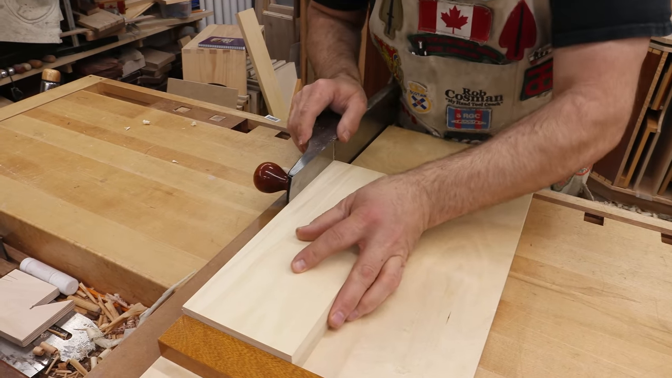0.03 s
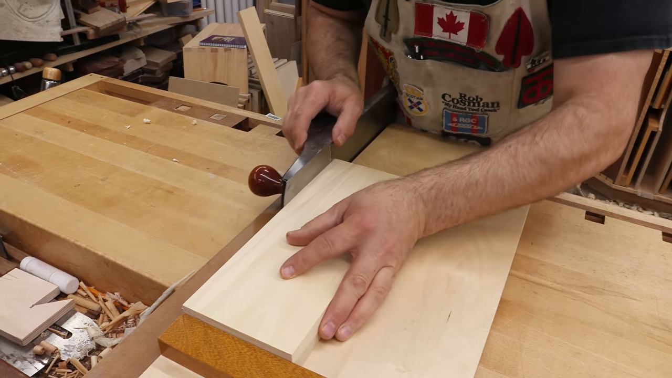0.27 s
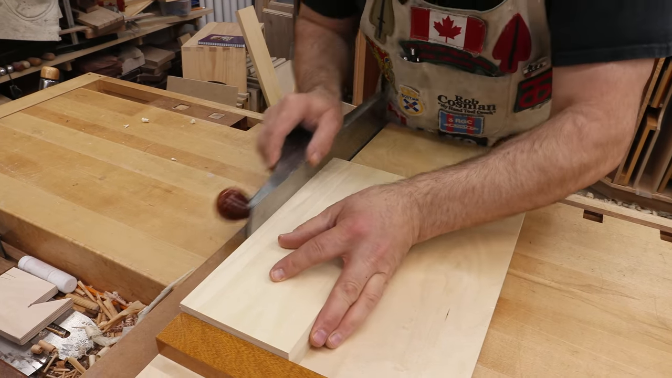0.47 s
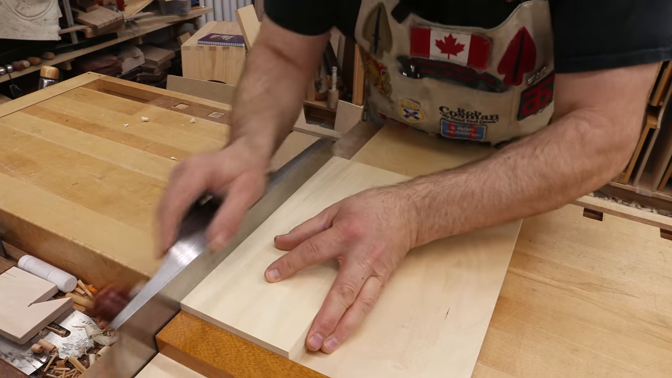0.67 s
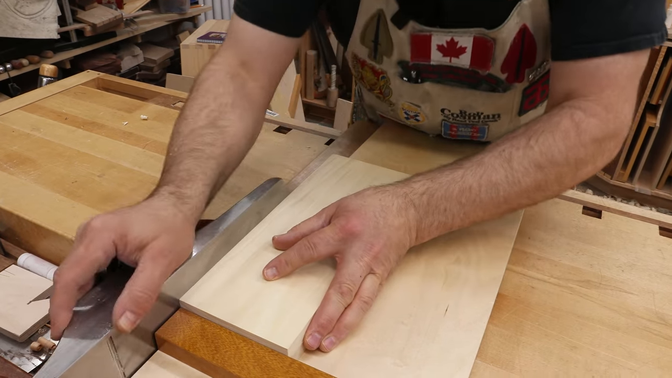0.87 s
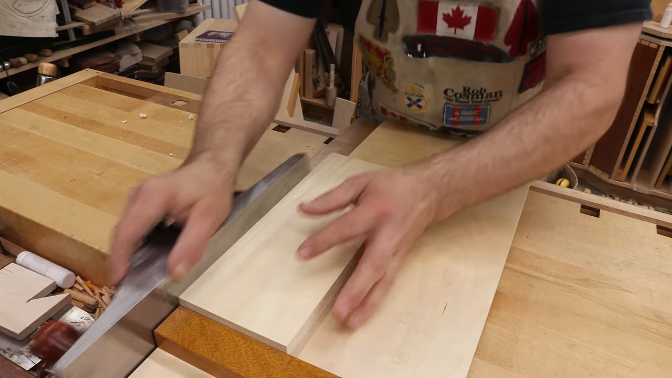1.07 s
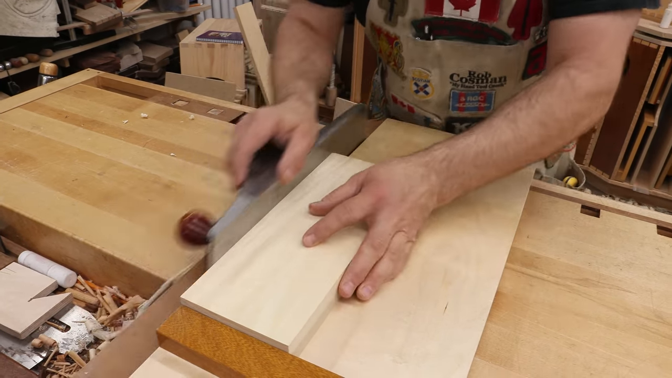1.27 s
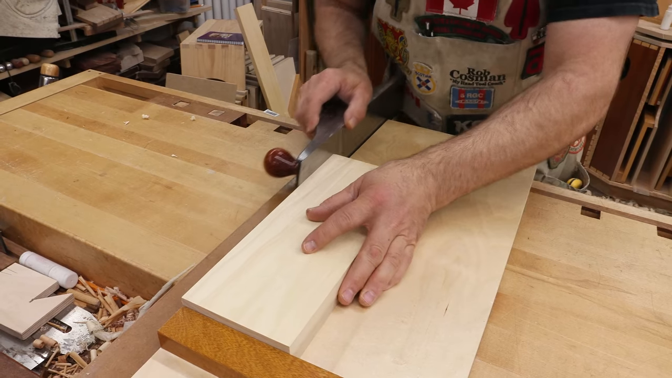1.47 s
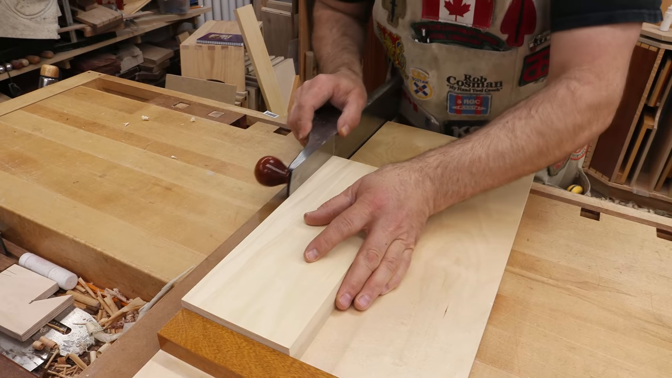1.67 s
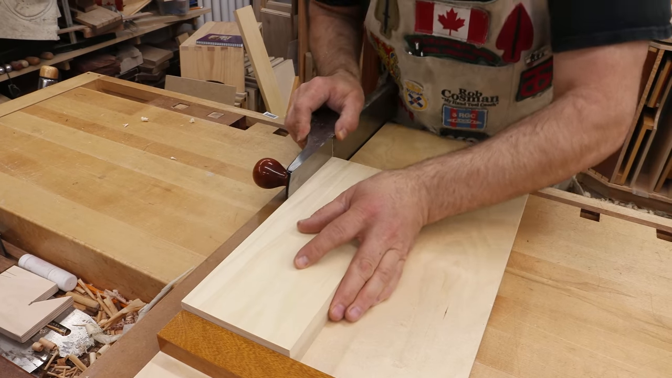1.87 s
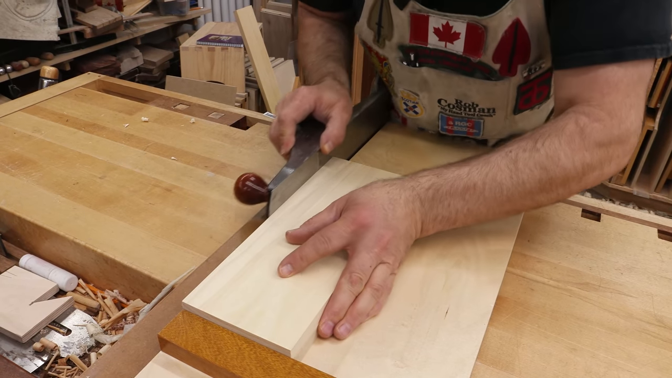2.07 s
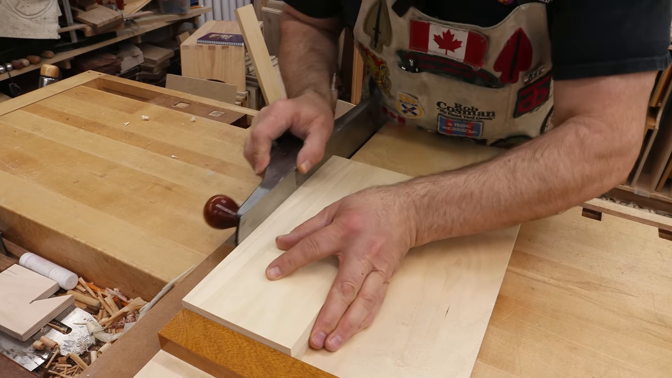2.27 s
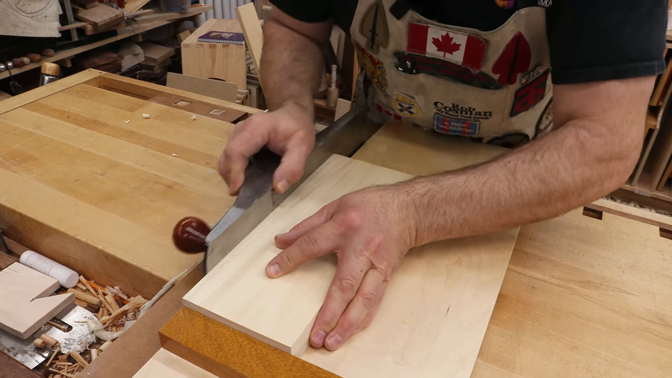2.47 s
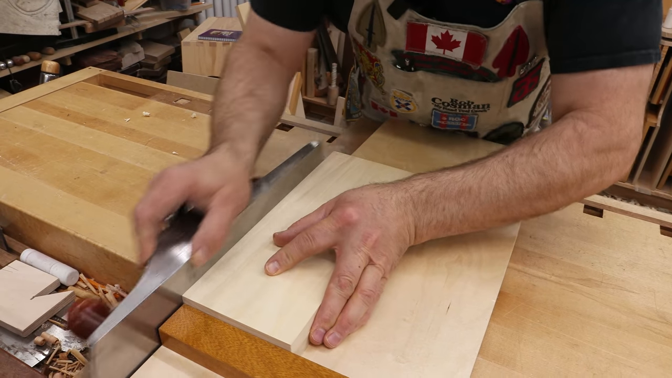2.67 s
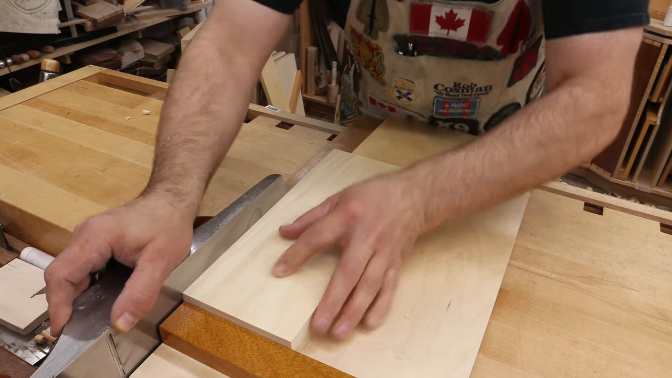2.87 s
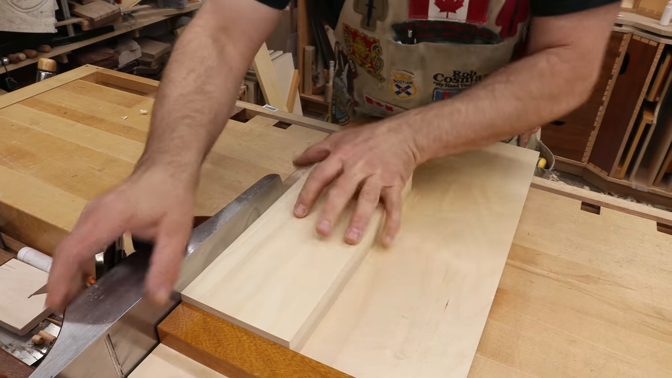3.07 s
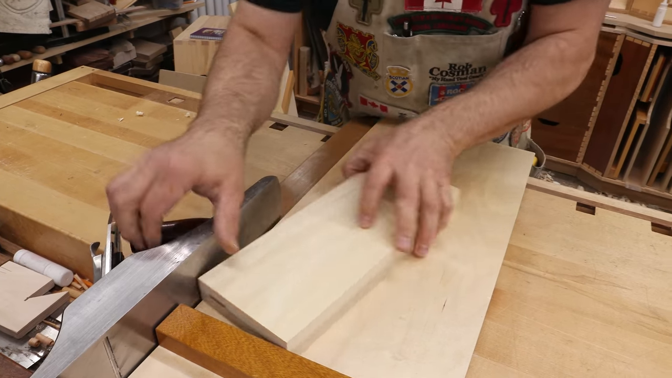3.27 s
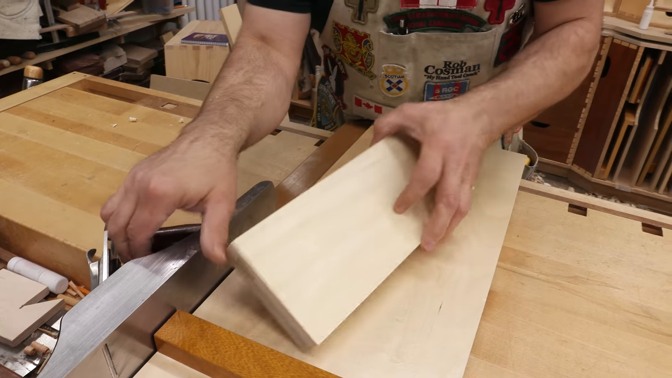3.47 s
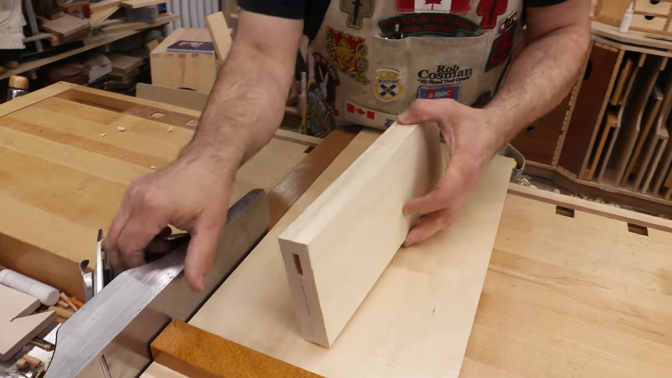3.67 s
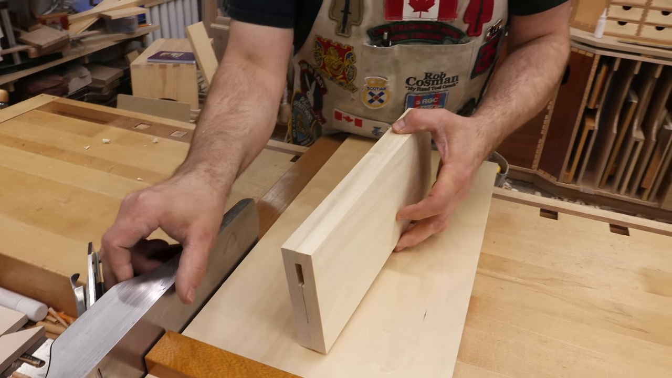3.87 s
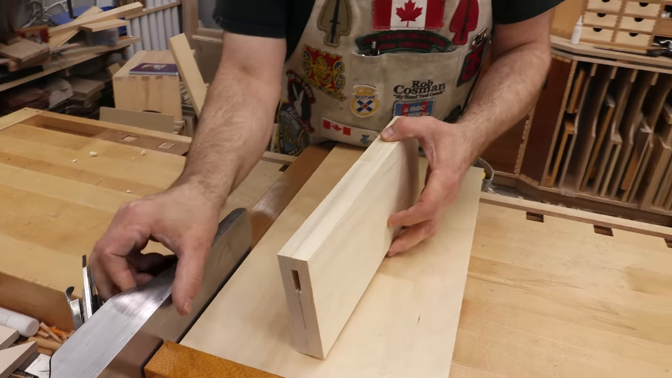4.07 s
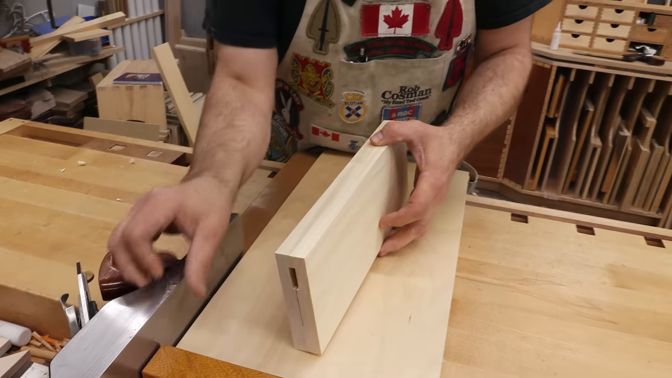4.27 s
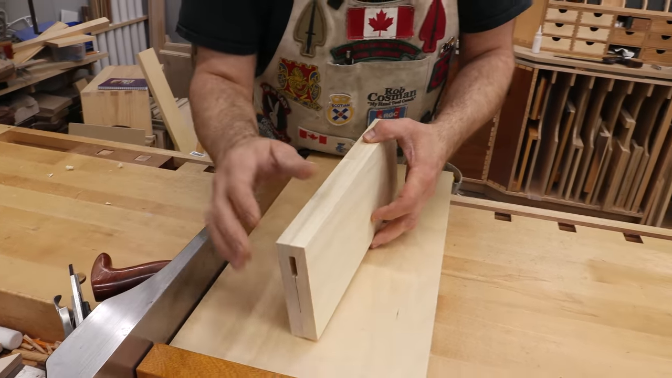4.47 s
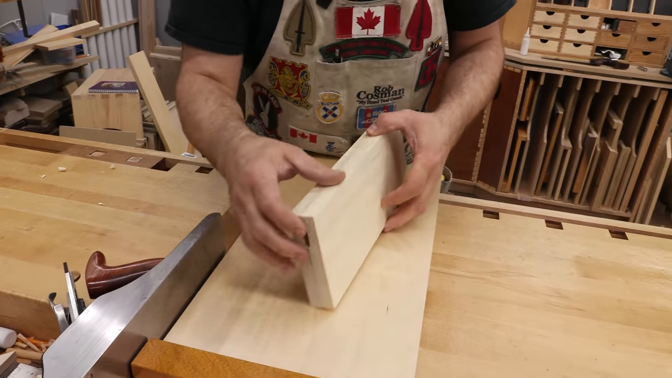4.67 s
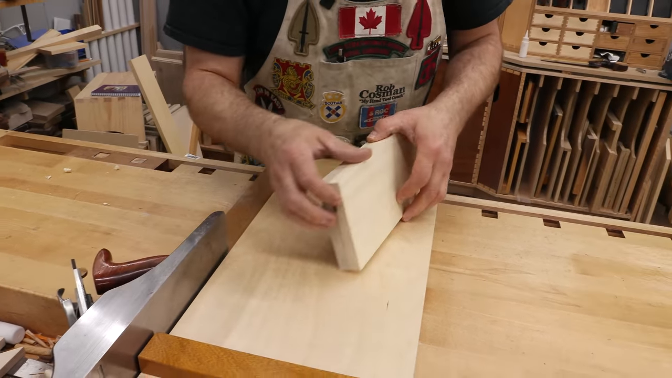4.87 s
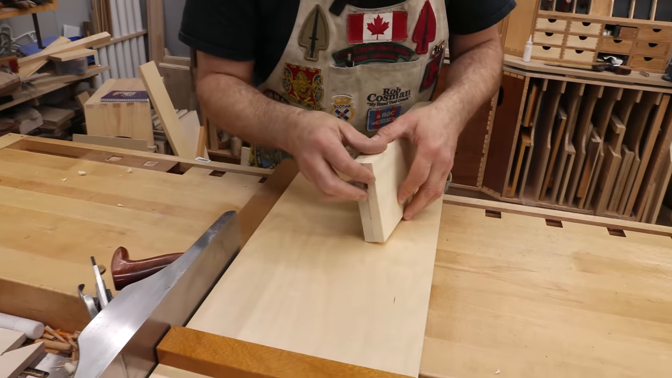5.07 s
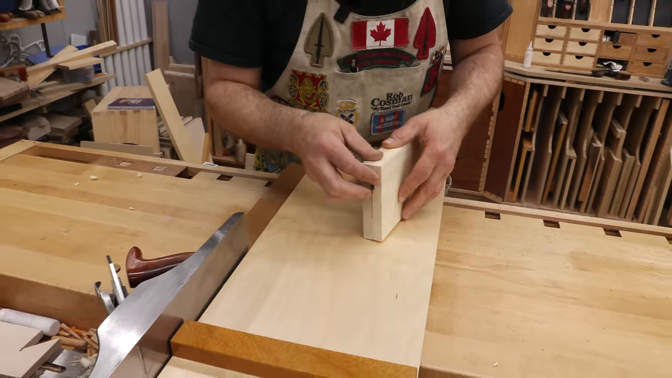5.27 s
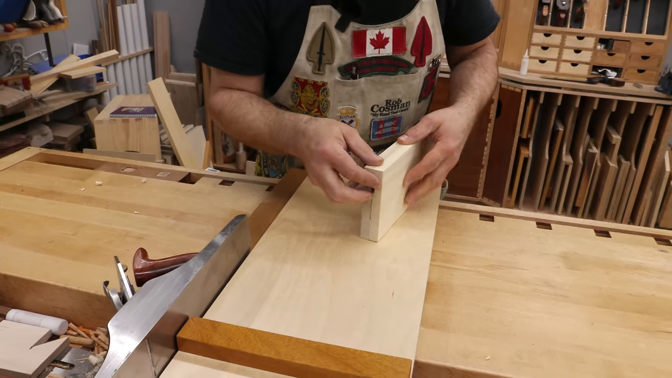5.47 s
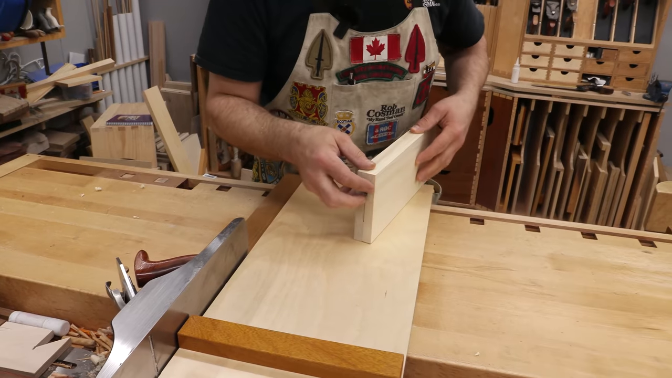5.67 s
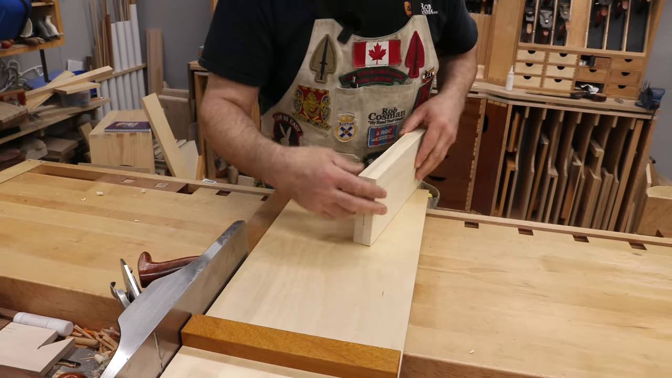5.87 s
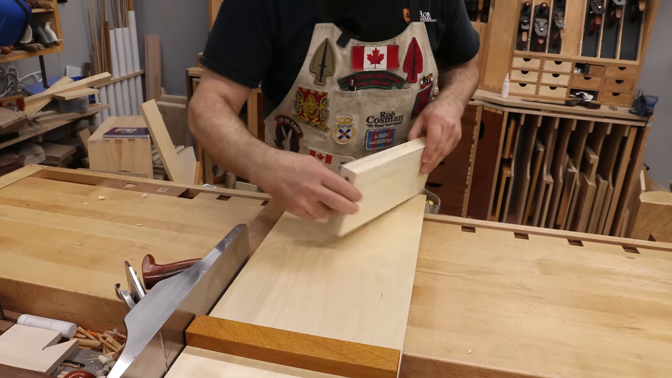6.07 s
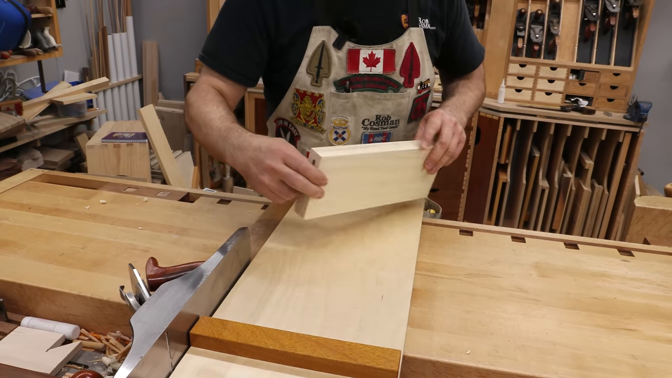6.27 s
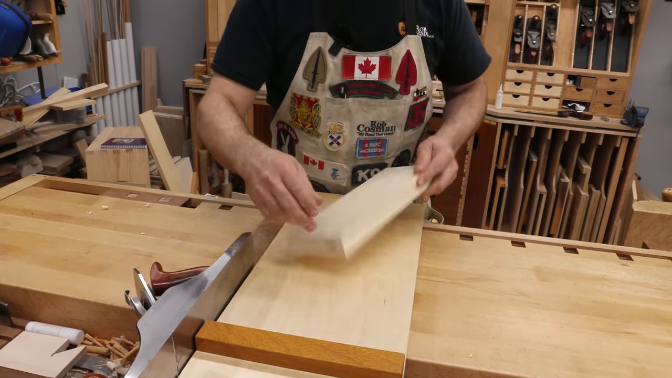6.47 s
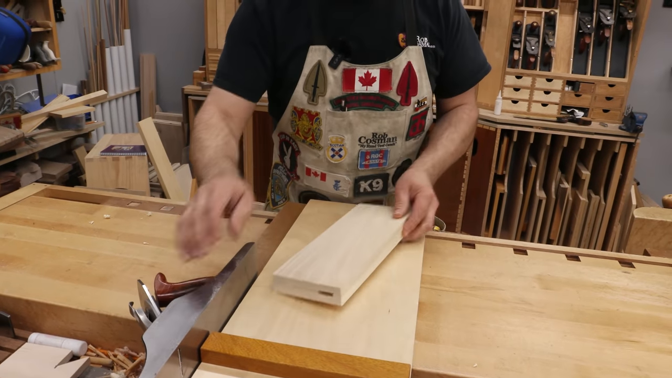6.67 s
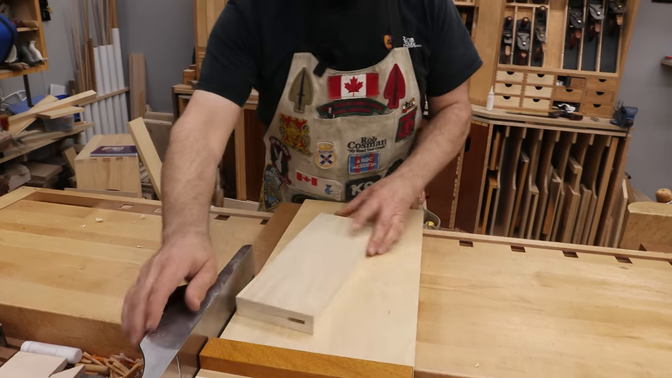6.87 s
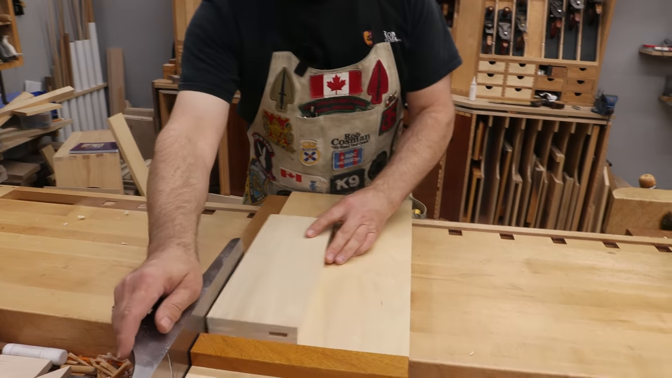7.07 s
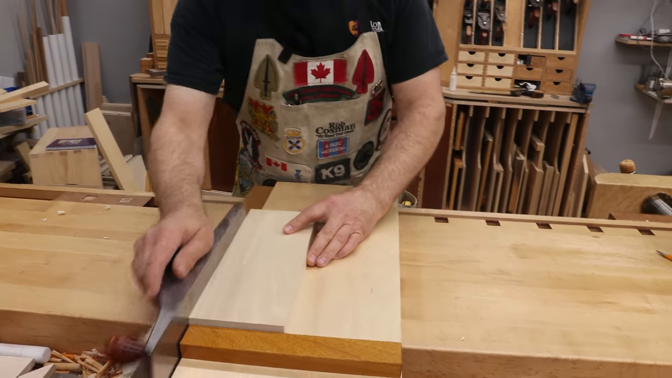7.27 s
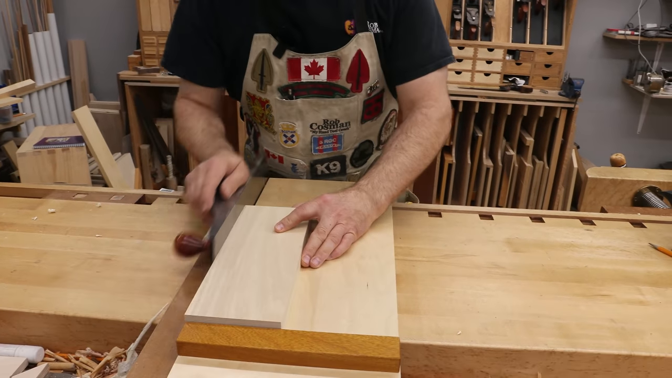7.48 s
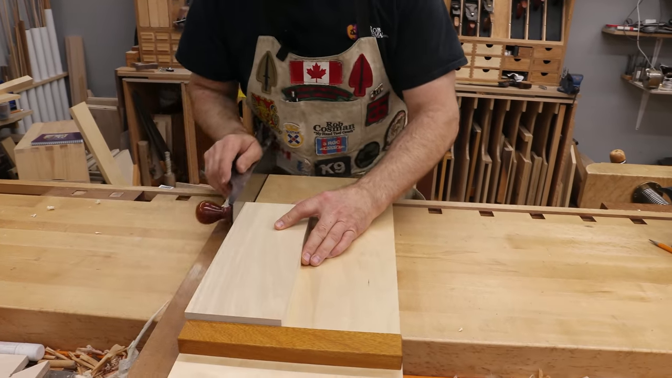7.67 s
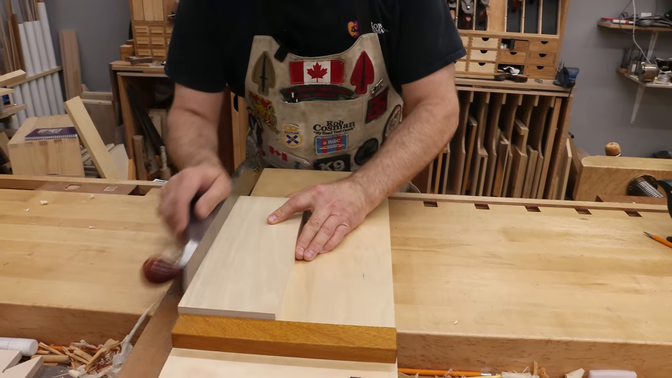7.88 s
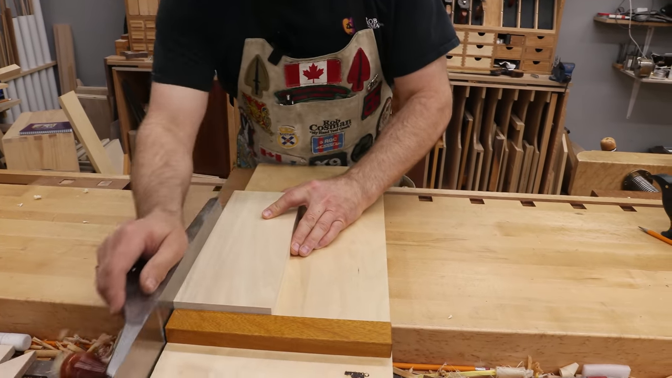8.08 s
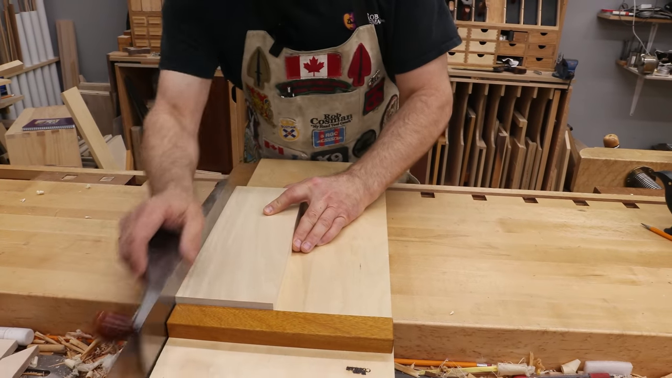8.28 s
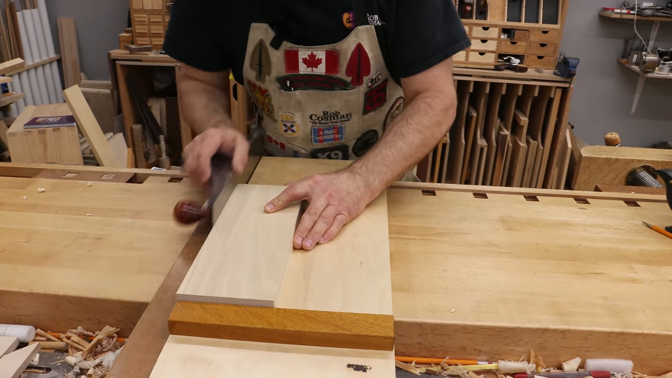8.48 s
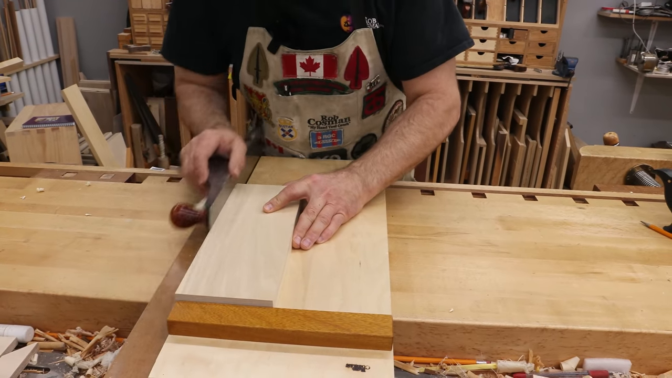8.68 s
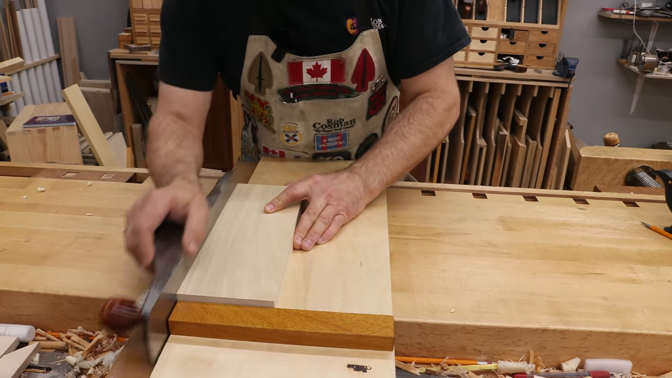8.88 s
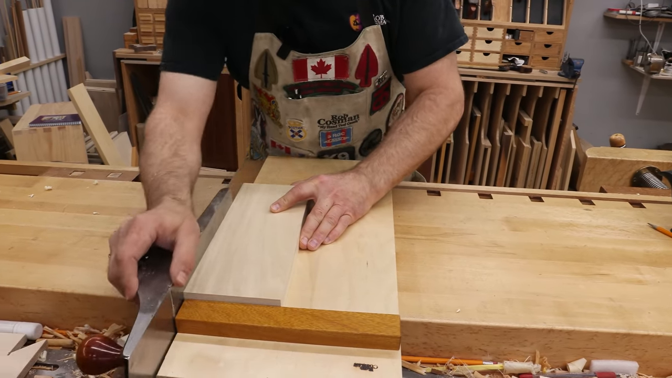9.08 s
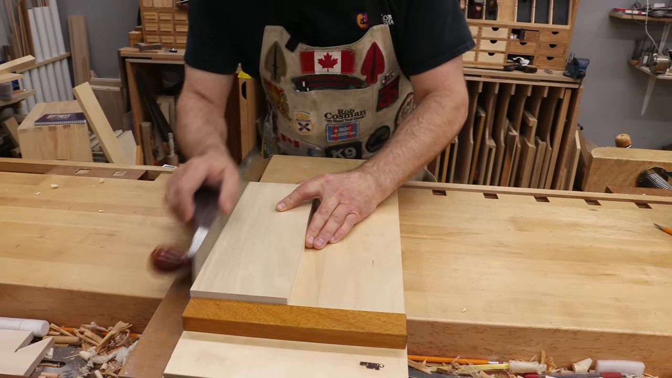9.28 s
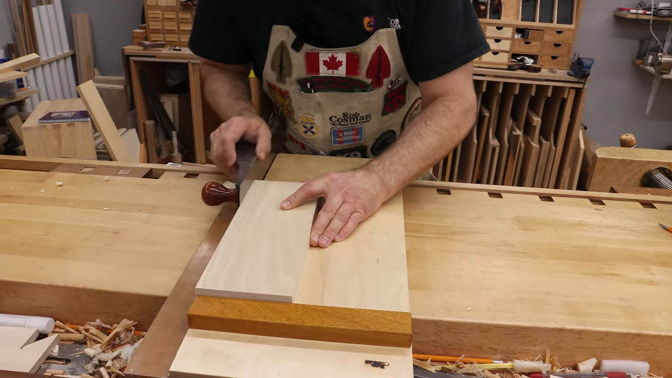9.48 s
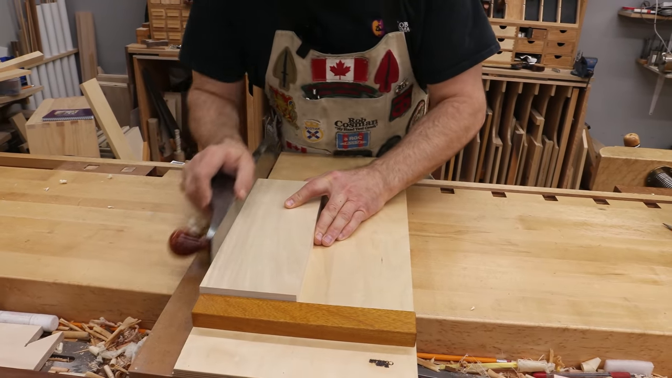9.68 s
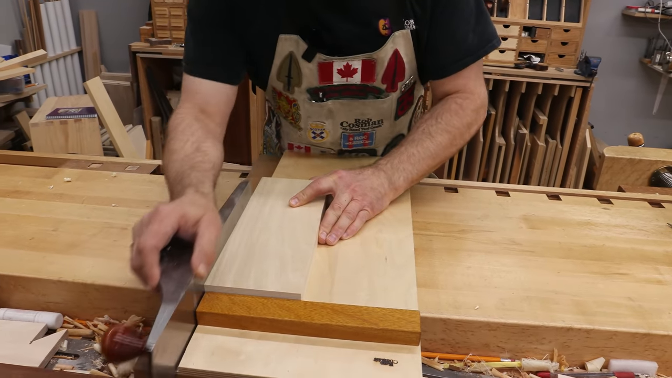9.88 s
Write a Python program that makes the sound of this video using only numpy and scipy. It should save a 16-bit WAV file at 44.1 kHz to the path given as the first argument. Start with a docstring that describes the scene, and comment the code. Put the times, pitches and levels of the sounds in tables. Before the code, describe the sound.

A small, quiet workshop heard closely, with faint low room air and short reflections. From 0 to 3 seconds a heavy iron plane slides back and forth along a wooden track: stuttering judder, gritty scrape and hiss, forceful cutting around 0.6-0.9 and 2.6-2.8, knocks at the stroke ends, a light chirpy return near 1.4 and a sharp knock near 1.8. From about 2.0 the sole grinds harder. From 3 to 6.5 the board is dragged and turned: soft wood and skin rubbing, a short squeak near 3.55, a small metallic ping at 4.2, a low stuttering pivot near 5, with a very faint high whine. At 6.6 the board lands with a loud woody clack, followed by more bright knocks at 6.9 and 7.25 as it is pushed home. From 7.4 to the end lighter, raspier strokes alternate with small thuds, the blade singing thinly in the last cuts.

```python
"""A heavy iron hand plane slides on its side along a shooting board and shears the end of a board.
Small quiet workshop, one microphone close by: the direct sound stands well above the reflections.
Uneven slips shake the bench, scrape and hiss in the iron, and the blade rasps, tears and sings.
Between two runs of strokes the board is lifted, turned, dropped and pushed home: rubbed wood and skin
are filtered grains, blows are dying modes with a clack, squeaks are tones on the modes of the board."""
import sys
import numpy as np
from scipy import signal
from scipy.fft import rfft, irfft, next_fast_len
from scipy.io import wavfile
from scipy.ndimage import uniform_filter1d

SR = 44100
rng = np.random.default_rng(int(sys.argv[2]) if len(sys.argv) > 2 else 0)


def wav_record(signal):
    """Record a signal, one row per channel, as 16-bit PCM in the file named by sys.argv[1]."""
    frames = np.transpose(np.atleast_2d(signal))
    bounded = np.clip(frames, -1, 1)
    # unit amplitude maps onto the largest positive 16-bit level
    quanta = np.round(bounded * 32767).astype(np.int16)
    wavfile.write(sys.argv[1], SR, quanta)


N = 438354
TIME = np.arange(N) / SR
RING_TIME = np.arange(SR // 3) / SR
TURNED_S = 5  # from here on the board lies the other way up and the contacts change colour


def amp(db):
    """Decibels to gain."""
    return 10 ** (np.asarray(db) / 20)


def evened(x):
    """Scales to an rms of one."""
    return x / np.sqrt(np.mean(x ** 2) + 1e-20)


def read(points, hz):
    """Reads a spectrum on a log-frequency axis."""
    f, value = np.transpose(points)
    return np.interp(np.log(hz + 1), np.log(f + 1), value)


def add(mix, s, sound):
    """Adds a sound at its time."""
    part = mix[round(s * SR):][:len(sound)]
    part += sound[:len(part)]


def low_cut(x, hz):
    """Removes what lies below hz."""
    return signal.sosfilt(signal.butter(2, hz, "high", fs=SR, output="sos"), x)


def softened(x, hz):
    """A contact of finite length passes little above its own frequency."""
    return signal.sosfilt(signal.butter(2, min(hz, .45 * SR), fs=SR, output="sos"), x)


def gliding(hz):
    """A sine that follows the curve hz."""
    return np.sin(2 * np.pi * np.cumsum(hz) / SR)


PRESSURE_HZ = 12  # how quickly the pressure of a hand wavers


def levels(rows, shapes):
    """One gain curve per layer: movements rise, hold with a swell and die away under a wavering hand."""
    t = np.arange(0, N / SR, .002)
    curves = []
    for k, (attack_share, lead_s, release_s, uneven_db) in enumerate(shapes):
        power = np.zeros(len(t))
        for start, end, *layer_db, swell_db, attack_s in rows:
            progress = np.clip((t - start) / max(end - start, 1e-3), 0, 1)
            before = np.maximum(start - lead_s - t, 0) / (attack_s * attack_share)
            after = np.maximum(t - end, 0) / release_s
            held = amp(layer_db[k] + swell_db * (progress - .5))
            power += (held * np.exp(-before - after)) ** 2
        steps = np.arange(0, N / SR + 1, 1 / PRESSURE_HZ)
        pressure = np.interp(t, steps, rng.standard_normal(len(steps)))
        curves.append(np.interp(TIME, t, np.sqrt(power) * amp(uneven_db * pressure)))
    return curves


def coloured(x, spectrum, peaks=()):
    """Shapes x by a broad spectrum with resonances on top; the ends roll off."""
    size = next_fast_len(N, True)
    hz = np.fft.rfftfreq(size, 1 / SR)
    db = read(spectrum, hz)
    for f, width, lift in peaks:
        db = db + lift / (1 + (2 * (hz - f) / width) ** 2)
    ends = np.minimum(hz / spectrum[0][0], 1) * np.minimum(spectrum[-1][0] / (hz + 1), 1)
    return evened(irfft(rfft(x, size) * amp(db) * ends ** 2, size)[:N])


def travelling(x, spectrum, peaks, ripple_db):
    """The contact moves along, so many weak resonances swell and fade around the fixed ones."""
    bins = signal.stft(x, nperseg=1024)[2]
    field = rng.standard_normal(bins.shape)
    # smooth over frequency, then over time
    field = uniform_filter1d(uniform_filter1d(field, size=4, axis=0), size=2, axis=0)
    field = uniform_filter1d(uniform_filter1d(field, size=14, axis=1), size=5, axis=1)
    rippled = signal.istft(bins * amp(ripple_db * evened(field)))[1][:N]
    return coloured(rippled, spectrum, peaks)


def grains(per_s, spread_db, clump_db, clump_hz):
    """Tiny slips of uneven size that come in clumps as the surfaces catch and let go."""
    clicks = (rng.random(N) < per_s / SR) * rng.choice([-1., 1.], N)
    sizes_db = spread_db * np.minimum(rng.exponential(1, N), 4)
    slow = signal.butter(2, clump_hz, fs=SR, output="sos")
    clumps = evened(signal.sosfilt(slow, rng.standard_normal(N)))
    return clicks * amp(sizes_db + clump_db * np.clip(clumps, -2, 2))


def ringing(modes, contact_hz, sign=-1):
    """Dying modes, peak of one: in step (sign 1) they crack, opposed they build up; soft contacts dull them."""
    ring = np.zeros(len(RING_TIME))
    for k, (hz, db, t60) in enumerate(modes):
        ring += sign ** k * amp(db - 60 * RING_TIME / t60) * np.sin(2 * np.pi * hz * RING_TIME)
    # little is radiated below the lowest mode
    ring = low_cut(softened(ring, contact_hz), 0.64 * modes[0][0])
    return ring / abs(ring).max()


def clack(hz, scatter, t60, damping):
    """A short push and the dense, fast-dying vibration behind it, rounded off by the contact."""
    fading = amp(-60 * RING_TIME / 0.023) + 0.29 * amp(-60 * RING_TIME / t60)
    after = rng.standard_normal(len(RING_TIME)) * fading
    push = scatter * after / np.linalg.norm(after)
    push[0] = 1
    contact = np.exp(-np.pi * damping * hz * RING_TIME) * np.sin(2 * np.pi * hz * RING_TIME)
    contact = low_cut(softened(contact, 2.3 * hz), 0.37 * hz)
    return signal.fftconvolve(push, contact / abs(contact).max())[:len(push)]


def resonate(x, hz, width):
    """A resonance of gain one that follows the curve hz."""
    turn = np.exp(2j * np.pi * np.cumsum(hz) / SR)
    r = np.exp(-np.pi * width / SR)
    return 2 * (turn * signal.lfilter([1 - r], [1, -r], x / turn)).real


# uneven slips: typical slips a second, their irregularity, share of the gain that they carry
CHATTER_HZ, CHATTER_JITTER, CHATTER_DEPTH = 48.14, .45, 0.2


def chatter():
    """The gain of a contact that catches and lets go: each slip starts hard and dies away."""
    wander = evened(uniform_filter1d(rng.standard_normal(N), size=500))
    turns = np.cumsum(CHATTER_HZ * np.exp(CHATTER_JITTER * wander)) / SR
    sizes = amp(3.8 * rng.standard_normal(N)[turns.astype(int)])
    slips = np.exp(-3 * (turns % 1)) * sizes
    return evened(1 - CHATTER_DEPTH + CHATTER_DEPTH * evened(slips))


# air of the still workshop: [f/Hz, level/dB per Hz], relative; then its rms level/dB
AIR = [(20, -30), (45, -8.5), (90, -1), (160, -2), (400, -9), (1000, -13), (2000, -16.5), (4000, -15.5),
       (6200, -22.5), (15500, -36)]
AIR_DB = -66.5


def still_air():
    """The empty room at the microphone: steady noise, coloured mostly low."""
    return amp(AIR_DB) * coloured(rng.standard_normal(N), AIR)


# speed of a small motor, heard as a faint whine: [t/s, f/Hz]; then its level/dB
WHINE = [(4.89, 12200), (4.99, 13750), (5.07, 13550), (5.17, 12750), (5.306, 11950), (5.47, 13000),
         (5.58, 11960)]
WHINE_DB = -86


def whine():
    """A thin, slightly unsteady tone that follows the motor's speed."""
    out = np.zeros(N)
    s, hz = np.transpose(WHINE)
    t = np.arange(s[0], s[-1], 1 / SR)
    unsteady = 1 + .004 * evened(uniform_filter1d(rng.standard_normal(len(t)), size=300))
    tone = evened(gliding(np.interp(t, s, hz) * unsteady))
    add(out, s[0], amp(WHINE_DB) * tone * signal.windows.tukey(len(t), .1))
    return out


# decay of the small workshop: [f/Hz, t60/s]
ROOM = [(120, 0.65), (400, 0.5), (1300, 0.56), (4000, 0.77), (8000, 0.99), (15000, 0.66)]


def workshop(x):
    """Dense reflections off shelves and walls, each band dying at its own speed."""
    t = np.arange(SR) / SR
    taps = rng.choice([-1., 1.], SR) * (rng.random(SR) < 3000 / SR) * (t > .006)
    hz, frames, bins = signal.stft(taps, SR, nperseg=256)
    tail = signal.istft(bins * amp(-60 * frames / read(ROOM, hz)[:, None]), SR)[1]
    return signal.fftconvolve(x, tail / np.linalg.norm(tail))[:N]


# a small steel part, at PING_S seconds: [f/Hz, level/dB, t60/s]
PING = [(893, -50, 0.16), (8150, -74, 0.27), (10830, -72, 0.93), (12330, -76, .35)]
PING_S = 4.235


def pinging():
    """A small steel part pings in a few long modes as the hand leaves the plane."""
    out = np.zeros(N)
    t = TIME[:SR]
    for hz, db, t60 in PING:
        add(out, PING_S, amp(db - 60 * t / t60) * np.sin(2 * np.pi * hz * t))
    return out


# fibres snap and loose metal clicks: [t/s, level/dB, brightness f/Hz]
SNAPS = [(0.672, -30, 5570), (0.847, -31, 6640), (1.794, -32.5, 6400), (2.855, -30.5, 7200),
         (4.094, -47, 3920), (6.5998, -29, 4000), (6.912, -16, 3760), (7.247, -32, 6260)]


def snapping():
    """Small bright clacks with more scatter than push."""
    out = np.zeros(N)
    for s, db, hz in SNAPS:
        add(out, s, amp(db) * softened(clack(hz, scatter=3.16, t60=0.18, damping=0.89), 0.91 * hz))
    return out


# the board dragged and turned in the hands; levels before the trims in handling():
# [start t/s, end t/s, bumping level/dB, rubbing level/dB, skin level/dB, swell/dB, attack/s]
RUBS = [(3.05, 3.2, -60, -62, -74, 3.5, 0.025), (3.268, 3.41, -50.5, -50, -74, -3, 0.024),
        (3.49, 3.52, -51.5, -58, -75, -2.5, 0.028), (3.565, 3.63, -49, -51, -73.5, 4, 0.012),
        (4.232, 4.275, -42.5, -54, -65, -9, 0.012), (4.36, 4.55, -85, -68, -83, 2, 0.022),
        (4.66, 4.74, -59, -58, -71.5, 5, .03), (4.78, 4.93, -50, -57, -70, -1, 0.029),
        (5.04, 5.14, -52, -61, -63.5, 1.5, 0.19), (5.31, 5.47, -74, -60, -74, -2, 0.14),
        (5.6, 5.76, -73, -66.5, -67, -2, 0.18), (5.9, 5.95, -65, -58.5, -72.5, 1, 0.032),
        (6.0, 6.08, -53, -58.5, -71.5, 6, 0.01), (6.13, 6.18, -58, -62, -67.5, 2, 0.016),
        (6.22, 6.26, -61, -57.5, -78, -0.5, .02), (6.31, 6.35, -54, -58.5, -68.5, -2.5, 0.022),
        (6.41, 6.48, -57.5, -56, -75.5, 4, 0.065), (6.83, 6.9, -44, -53.5, -71, 2.5, 0.045)]
# rows for bumping, rubbing, skin: [share of the attack, head start/s, release/s, unevenness/dB]
RUB_SHAPE = [(.9, 0, 0.025, 8), (1.1, 0.013, 0.064, -0.4), (1.3, .005, .03, 2)]
# relative colours of the board bumping on the bench, rubbed wood, skin on planed wood: [f/Hz, level/dB per Hz]
BUMP, RUB, SKIN = [(60, -20), (150, -4.5), (210, -9), (305, 6), (420, -2), (650, -10.5), (1200, -17)], [(500, -7.5), (750, -2.5), (1400, -2.5), (2200, -3), (3200, -5.5),
                                 (5000, -22.5), (9000, -56.5)], [(1800, -3.5), (3500, 2.5), (4600, -5.5), (5600, 0),
                                              (7500, -4.5), (10300, -10), (12500, -17.5), (15500, -24)]
# resonances of the board under fingers and edges: [f/Hz, width/Hz, lift/dB]
WOOD = [(620, 130, 8.5), (1325, 70, 10.5), (2040, 410, 7.5), (2780, 170, 2.5), (3620, 290, -1.5),
        (4700, 510, 6)]
# modes of the loose board: [f/Hz, relative level/dB, t60/s]
BOARD = [(1070, -5.5, .022), (1193, 5, 0.015), (1297, 2.5, .075), (2000, -7, 0.064), (2680, -9.5, .045),
         (3670, -8, 0.057), (4500, -22, .04)]


def handling():
    """The board drags on its edge and turns between the fingers; rubbing wakes its modes."""
    bump, rub, swish = levels(RUBS, RUB_SHAPE)
    slips = grains(per_s=2800, spread_db=-0.2, clump_db=0.9, clump_hz=30)
    ring = evened(signal.fftconvolve(slips, ringing(BOARD, contact_hz=3980, sign=0.84))[:N])
    wood = travelling(slips, RUB, WOOD, ripple_db=5.5) + amp(-17.0) * ring
    touches = grains(per_s=13000, spread_db=3.0, clump_db=1.5, clump_hz=40.2)
    skin = travelling(touches, SKIN, WOOD, ripple_db=1.0)
    bumping = amp(-7.5) * bump * coloured(slips, BUMP)
    return bumping + amp(-5.0) * rub * wood + amp(3.5) * swish * skin


# the board pivots on its edge: [start t/s, end t/s, level/dB, swell/dB, attack/s]
PIVOT = [(4.93, 5.4, -56.5, -11, 0.032)]
# relative colour of its drone: [f/Hz, level/dB per Hz]
PIVOT_COLOUR = [(200, -10), (335, 4), (430, -8.5), (540, -10), (660, 2), (800, -17), (1200, -30)]


def pivoting():
    """The board's edge stutters over the shooting board as it is swung round."""
    level, = levels(PIVOT, [(1, 0.02, 0.25, 2.1)])
    slips = grains(per_s=400, spread_db=6.0, clump_db=1.0, clump_hz=39.8)
    return level * coloured(slips, PIVOT_COLOUR)


# a corner of the dragged board: [t/s, length/s, lower mode level/dB, upper mode level/dB]
SQUEAKS = [(3.468, 0.081, -63, -61), (3.537, 0.099, -51, -57), (3.574, 0.08, -41.5, -63),
           (6.722, 0.3, -54, -58)]
# modes of the board that a squeak locks to: [f/Hz]
SQUEAK_HZ = (1308, 2030, 3230)
SQUEAK_WANDER = 0.009  # wander of the pitch (rms share)
SQUEAK_TOP_DB = -16  # the highest mode, relative to the one below it


def squeaking():
    """A dragged corner sticks and slips in step with the modes of the board."""
    out = np.zeros(N)
    for s, length, lower_db, upper_db in SQUEAKS:
        for hz, db in zip(SQUEAK_HZ, (lower_db, upper_db, upper_db + SQUEAK_TOP_DB)):
            unsteady = evened(uniform_filter1d(rng.standard_normal((2, SR)), size=300))
            wobble, grip = unsteady[:, :round(length * SR)]
            tone = gliding(hz * (1 + SQUEAK_WANDER * wobble))
            tone = tone * (1 + 0.32 * softened(grip, hz=300))
            add(out, s, amp(db) * evened(tone * np.hanning(len(tone))))
    return out


# bench with the shooting board on it: [f/Hz at pitch 1, relative level/dB, t60/s]
BENCH = [(119, -16, 0.055), (147.9, -8.5, 0.12), (201, -7, 0.14), (300.6, 7.5, 0.057), (354.7, 5, 0.13),
         (425, -5, 0.11), (538, 0, 0.052), (609, -2, 0.055), (703, -4, 0.073), (856, -15, 0.11)]


def knock(thud_db, clack_db, hz, rattle, pitch=1):
    """A blow clacks at the contact and sets the bench thudding."""
    bench = [(f * pitch, db, t60) for f, db, t60 in BENCH]
    thud = amp(thud_db) * ringing(bench, 1.23 * hz)
    return thud + amp(clack_db) * clack(hz, scatter=rattle, t60=0.086, damping=0.47)


# the board lands and is pushed home against the fence:
# [t/s, thud level/dB, clack level/dB, contact hardness f/Hz, board level/dB, fence level/dB, rattle 0-1]
BOARD_KNOCKS = [(4.897, -26.5, -60, 233, -54, -58, 1), (5.957, -45, -56, 298, -62, -72, 0.98),
                (6.5995, -22, -26, 1070, -9.5, -24, 0.4), (6.6015, -8, -10, 1000, -11, -27, 0.95),
                (6.6587, -25, -28, 2300, -18.5, -46, 0.95), (6.675, -22.5, -15.5, 1280, -2.5, -21.5, 0.6),
                (6.821, -38, -43, 900, -42, -56, 0.9), (6.912, -34, -13.5, 1750, -45, -28, 0.97),
                (6.9136, -13.5, -10, 1520, -37, -16.5, 0.5), (7.154, -39, -32, 1200, -56, -28, 1),
                (7.209, -27.5, -34, 1270, -55, -27, 0.8), (7.2476, -13.5, -8, 940, -31, -16, 0.72)]
# modes of the fence of the shooting board: [f/Hz, relative level/dB, t60/s]
FENCE = [(485, 5, 0.069), (541, 4, 0.087), (658, 0.5, 0.14), (768, 5, 0.088), (856, 4, 0.12),
         (1518, -4, 0.021), (1870, 1, 0.033)]


def board_knocks():
    """Each blow of the board rings the board itself and the fence besides the bench."""
    out = np.zeros(N)
    for s, thud_db, clack_db, hz, ring_db, fence_db, rattle in BOARD_KNOCKS:
        board = amp(ring_db) * ringing(BOARD, 1.38 * hz, sign=0.95)
        fence = amp(fence_db) * ringing(FENCE, 2 * hz, sign=1)
        add(out, s, knock(thud_db, clack_db, hz, rattle) + board + fence)
    return out


# the plane on its track and the fence: [t/s, thud level/dB, clack level/dB, contact hardness f/Hz]
PLANE_KNOCKS = [(.12, -38, -40, 1050), (.576, -25, -27.5, 690), (.659, -26, -24.5, 1300),
                (.675, -18.5, -20, 2050), (0.819, -24, -9, 1290), (1.046, -37.5, -49, 437),
                (1.206, -39, -39.5, 700), (1.514, -35.5, -75, 126), (1.624, -38.5, -55, 845),
                (1.7801, -34, -22.5, 550), (1.7822, -57, -31, 2150), (1.7824, -22, -16.5, 464),
                (2.017, -34, -34, 593), (2.7999, -27.5, -12.5, 1230), (2.954, -37, -60, 393),
                (4.41, -53, -51, 1810), (7.553, -31.5, -35, 1010), (7.639, -43, -29.5, 774),
                (7.636, -38.5, -33.5, 170), (7.802, -41, -43, 600), (8.121, -29, -25, 634),
                (8.169, -29.5, -47, 705), (8.247, -37.5, -45, 400), (8.3737, -27, -23, 600),
                (8.659, -49, -37, 1100), (8.679, -38, -30, 716), (9.037, -28, -22, 996),
                (9.178, -41, -47, 438), (9.2761, -31.5, -24, 580), (9.564, -39, -58, 129),
                (9.59, -35.5, -36, 506)]
PLANE_RATTLE = 0.79  # how much the plane rattles on after a knock
FIRST_PITCH = 1.05  # the bench thuds this much higher before the board is turned (ratio)


def plane_knocks():
    """The iron plane knocks on its track and the fence, and the bench answers."""
    out = np.zeros(N)
    for s, thud_db, clack_db, hz in PLANE_KNOCKS:
        pitch = FIRST_PITCH if s < TURNED_S else 1
        add(out, s, knock(thud_db, clack_db, hz, PLANE_RATTLE, pitch))
    return out


# the dry sole drawn back lightly: [start t/s, end t/s, level/dB, swell/dB, attack/s]
CHIRPS = [(1.33, 1.5, -57.5, -4, 0.03)]
# what the chirps ring with: [f/Hz, relative level/dB, t60/s]
CHIRP_MODES = [(2480, -3, 0.024), (2700, -3, 0.034), (3160, -1, 0.018)]


def chirping():
    """The sole sticks and slips in short bursts that ring the iron."""
    level, = levels(CHIRPS, [(0.93, 0.0034, 0.029, 2.6)])
    slips = grains(per_s=1000, spread_db=0, clump_db=5, clump_hz=35)
    return level * evened(signal.fftconvolve(slips, ringing(CHIRP_MODES, contact_hz=8000))[:N])


# the sole binds for a moment: [start t/s, end t/s, level/dB, first f/Hz, last f/Hz]
GROANS = [(0.672, 0.698, -21.5, 338, 329), (0.923, 0.973, -45, 347, 318), (1.785, 1.813, -30, 369, 330),
          (2.519, 2.556, -27.5, 370, 377), (9.383, 9.418, -37.5, 340, 320)]


def groaning():
    """Regular slips drive the bench at one gliding pitch, a short sine that fades in and out."""
    out = np.zeros(N)
    for start, end, db, first_hz, last_hz in GROANS:
        hz = np.linspace(first_hz, last_hz, round((end - start) * SR))
        add(out, start, amp(db) * evened(gliding(hz)) * signal.windows.tukey(len(hz), .5))
    return out


# an edge of the board scrapes in one shifting note: [start t/s, end t/s, level/dB, first f/Hz, last f/Hz]
SCRAPES = [(3.242, 3.453, -58.5, 1850, 2050), (5.17, 5.263, -60, 2190, 2350),
           (5.77, 5.847, -63, 2350, 2290), (6.495, 6.547, -53.5, 2260, 2450)]
# the sole grinds where it bears hardest: [start t/s, end t/s, level/dB, first f/Hz, last f/Hz]
GRINDS = [(0.412, 0.54, -41.5, 990, 1180), (2.057, 2.138, -44, 1670, 1830), (2.12, 2.273, -42, 1800, 1610),
          (2.139, 2.224, -37, 1040, 980), (2.325, 2.488, -34, 1010, 890), (2.49, 2.627, -33.5, 700, 900),
          (2.64, 2.8, -39.5, 2660, 2280), (2.715, 2.81, -41, 1930, 1520), (7.367, 7.572, -54.5, 1890, 1860),
          (7.922, 8.124, -42.5, 1150, 1060), (9.79, 9.925, -48.5, 3760, 3340)]
# width of each of the two resonances in series: the note of the iron is narrower than that of the wood
GRIND_WIDTH_HZ, SCRAPE_WIDTH_HZ = 300, 1000


def grinding(rows, width_hz):
    """Chattering grit sounds in one resonance that moves with the contact."""
    out = np.zeros(N)
    grit = chatter() * grains(per_s=2500, spread_db=-1.5, clump_db=0, clump_hz=60)
    for start, end, db, first_hz, last_hz in rows:
        part = grit[round(start * SR):round(end * SR)]
        hz = np.linspace(first_hz, last_hz, len(part))
        note = resonate(resonate(part, hz, width_hz), hz, width_hz)
        add(out, start, amp(db) * evened(note) * signal.windows.tukey(len(part), .6))
    return out


# the loaded blade in end grain: [start t/s, end t/s, song level/dB, tearing level/dB]
CUTS = [(0.585, 0.87, -57, -50), (2.622, 2.821, -54, -37.5), (7.916, 8.133, -56, -70),
        (8.854, 9.027, -46, -55), (9.7, 9.99, -45, -55)]
# modes of the blade and its cap iron: [f/Hz, relative level/dB, t60/s]
BLADE = [(2870, 3, 0.0088), (3570, 14, 0.0054), (4630, -1, 0.031), (4810, 0.5, 0.032), (6330, -8, 0.049),
         (8460, -8.5, 0.034)]
SHAVING_HISS_DB = -11  # hiss of the shaving, relative to the tearing


def cutting():
    """The blade tears through end grain; each severed fibre plucks it, and the shaving hisses out."""
    plucks = grains(per_s=3400, spread_db=2, clump_db=0, clump_hz=60)
    song = evened(signal.fftconvolve(plucks, ringing(BLADE, contact_hz=11920))[:N])
    fibres = chatter() * grains(per_s=1600, spread_db=-3.0, clump_db=-4.5, clump_hz=120)
    tearing = travelling(fibres, RASP_FIRST, IRON, ripple_db=3.5)
    tearing = tearing + amp(SHAVING_HISS_DB) * coloured(plucks, HISS, IRON)
    sing, tear = np.zeros((2, N))
    for start, end, song_db, tear_db in CUTS:
        bite = signal.windows.tukey(round((end - start) * SR), .4)
        add(sing, start, amp(song_db) * bite)
        add(tear, start, amp(tear_db) * bite)
    return sing * song + tear * tearing


# the plane pushed or drawn back along its track; levels before the trims in scene():
# [start t/s, end t/s, judder level/dB, scrape level/dB, rasp level/dB, hiss level/dB, swell/dB, attack/s]
SLIDES = [(0.0, 0.067, -45.5, -51.5, -63, -61.5, -2.5, .02),
          (0.241, 0.277, -35.5, -48, -53.5, -64.5, -0.5, 0.082),
          (0.406, 0.49, -33.5, -38, -59, -63, 4.5, 0.055), (0.586, 0.803, -38, -41, -44.5, -51.5, -3, 0.1),
          (0.82, 0.974, -54, -53.5, -74, -58, -9, 0.024),
          (1.119, 1.272, -56.5, -58.5, -55, -59, 1.5, 0.074),
          (1.395, 1.537, -39.5, -45.5, -47, -59, 0.5, 0.065),
          (1.71, 1.975, -64, -58.5, -60.5, -68.5, -0.5, 0.03),
          (2.03, 2.122, -28.5, -36, -56, -58, 1, 0.026), (2.176, 2.415, -30, -33.5, -52, -54, -1, 0.044),
          (2.47, 2.584, -33.5, -33, -54, -58.5, -0.5, 0.038),
          (2.62, 2.788, -42.5, -37, -47, -54, -3.5, 0.018), (2.82, 2.944, -50, -74, -80, -64, -10, 0.023),
          (6.986, 7.34, -73, -53.5, -63.5, -71, 3.5, 0.027), (7.382, 7.588, -52, -57, -56.5, -60, 4, 0.023),
          (7.664, 7.71, -60, -46, -54, -65, -5.5, 0.04), (7.8, 7.87, -62, -64, -58.5, -64, 1, 0.012),
          (7.936, 8.112, -47.5, -45, -52, -55.5, -0.5, 0.065), (8.38, 8.612, -43, -48, -52, -58, 3, 0.05),
          (8.811, 9, -44, -41, -51.5, -55.5, 3.5, 0.16), (9.29, 9.36, -43.5, -49.5, -55, -60, 0.5, 0.047),
          (9.387, 9.529, -45, -45.5, -54, -58.5, 1, 0.025),
          (9.68, 9.95, -46.5, -41.5, -50, -55.5, 2.5, 0.059)]
# the sole hisses before the bench judders; rows for judder, scrape, rasp, hiss:
# [share of the attack, head start/s, release/s, unevenness/dB]
SLIDE_SHAPE = [(0.45, 0.0075, 0.026, 3), (0.44, 0.0013, 0.066, 1.5), (0.81, 0.0017, 0.049, 3),
               (0.75, 0.016, 0.054, -3.5)]
# relative colours of the bench under a light and a hard-pressed plane: [f/Hz, level/dB per Hz]
JUDDER_LIGHT, JUDDER_HEAVY = [(50, -31), (130, -25.5), (240, -5), (300, 0), (350, 9), (430, -6), (560, -7),
                              (700, -15), (1500, -22)], [(50, -40), (200, -21.5), (300, -6), (365, 2.5),
                                                    (450, 5.5), (560, -13.5), (700, -33), (1500, -75)]
FULL_LOAD_DB = -33  # judder level, before its trim, at which the load is full
# relative colours of the scraping sole before and after the board is turned: [f/Hz, level/dB per Hz]
SCRAPE_FIRST, SCRAPE_LATER = [(300, -52), (600, 3), (780, 2), (860, -4.5), (990, 3), (1130, -4), (1300, -4),
                              (1550, -7), (2100, -16), (4000, -29)], [(300, -15), (600, 1), (720, -2), (830, 4), (1130, -4.5),
                                                    (1280, 2), (1520, -15.5), (4000, -21.5)]
# relative colours of the rasping blade before and after the board is turned: [f/Hz, level/dB per Hz]
RASP_FIRST, RASP_LATER = [(800, -33), (1400, 4.5), (1800, 0.5), (2550, 6), (3000, -4.5), (3400, -7.5),
                          (4200, -13), (8000, -47)], [(800, -15), (1650, -2.5), (2000, 5.5), (2750, -1.5),
                                              (3100, -5), (3700, -12.5), (4400, -28), (8000, -42.5)]
# relative colour of sliding iron: [f/Hz, level/dB per Hz]
HISS = [(1800, 0), (3300, 2), (4300, -0.5), (5500, 0), (7000, -2.5), (9000, -7), (11000, -13),
        (13000, -22.5), (15500, -30.5)]
# narrow resonances of the iron body: [f/Hz, width/Hz, lift/dB]
IRON = [(1147, 44, 7.5), (2350, 130, -1), (2610, 44, 3.5), (3560, 370, 2), (4620, 56, -1.5), (4730, 65, 7),
        (6370, 380, 1.5), (8830, 310, 3)]
# the weight of the moving plane in the bench: [f/Hz, level/dB per Hz], relative
RUMBLE = [(50, -19), (95, 0), (140, 2.5), (220, -2.5), (400, -39)]
RUMBLE_DB = -6.5  # relative to the hiss before its trim


def planing(rows, colours, judder_db, scrape_db, rasp_db, hiss_db):
    """Coarse slips shake the bench, finer ones sound in the iron, and the blade tears through fibres."""
    judder, scrape, rasp, hiss = levels(rows, SLIDE_SHAPE)
    scrape_colour, rasp_colour = colours
    # bearing down hard makes the bench judder higher
    slips = grains(per_s=1100, spread_db=-4.0, clump_db=0.5, clump_hz=70.6)
    load = np.minimum(judder / amp(FULL_LOAD_DB), 1)
    bench = (1 - load) * coloured(slips, JUDDER_LIGHT) + load * coloured(slips, JUDDER_HEAVY)
    catches = chatter() * grains(per_s=3500, spread_db=1.5, clump_db=-1.5, clump_hz=80)
    sole = travelling(catches, scrape_colour, IRON, ripple_db=2.5)
    fibres = grains(per_s=3500, spread_db=1.0, clump_db=1.5, clump_hz=119.3)
    blade = travelling(fibres, rasp_colour, IRON, ripple_db=3.0)
    fine_slips = grains(per_s=12000, spread_db=2.5, clump_db=1.03, clump_hz=70)
    slide = travelling(fine_slips, HISS, IRON, ripple_db=3.0)
    out = amp(RUMBLE_DB) * hiss * coloured(rng.standard_normal(N), RUMBLE)
    out += amp(judder_db) * judder * bench
    out += amp(scrape_db) * scrape * sole
    out += amp(rasp_db) * rasp * blade
    out += amp(hiss_db) * hiss * slide
    return out


def scene():
    """Two runs of strokes with the handling between them, in a quiet room."""
    first_rows = [row for row in SLIDES if row[0] < TURNED_S]
    later_rows = [row for row in SLIDES if row[0] >= TURNED_S]
    first = planing(first_rows, (SCRAPE_FIRST, RASP_FIRST),
                    judder_db=0.0, scrape_db=-2.5, rasp_db=-4.0, hiss_db=1.0)
    later = planing(later_rows, (SCRAPE_LATER, RASP_LATER),
                    judder_db=-1.5, scrape_db=-0.6, rasp_db=2.5, hiss_db=3.5)
    iron = first + later + grinding(GRINDS, GRIND_WIDTH_HZ) + groaning() + chirping() + cutting()
    wood = grinding(SCRAPES, SCRAPE_WIDTH_HZ) + handling() + pivoting()
    rubbing = iron + wood
    blows = plane_knocks() + board_knocks() + snapping() + pinging()
    squeaks = squeaking()
    reflected = workshop(amp(-13.5) * rubbing + amp(-12.5) * blows + amp(-18.5) * squeaks)
    return (rubbing + blows + squeaks + reflected + still_air() + whine())[None]


EDGE_HZ = 15700  # upper edge of the band


def record(dry):
    """The recorder behind the microphone rounds off the very highest peaks, then limits the band."""
    rounded = dry / (1 + (dry / .85) ** 6) ** (1 / 6)
    band = signal.firwin(511, EDGE_HZ, window=("kaiser", 9), fs=SR)
    return signal.oaconvolve(rounded, band[None], "same")


dry = scene()
out = record(dry)
wav_record(out)
```